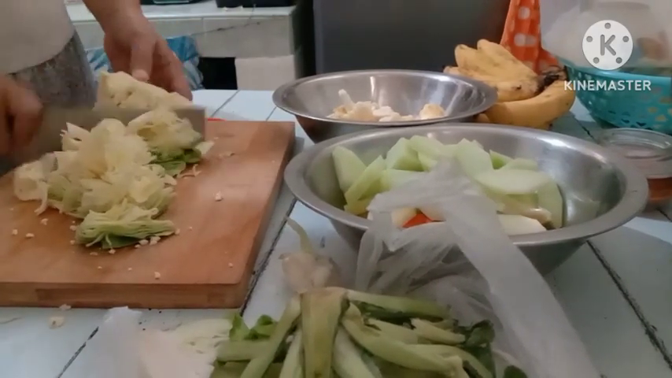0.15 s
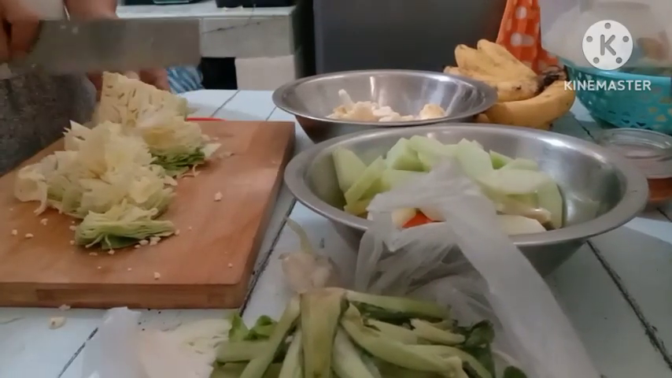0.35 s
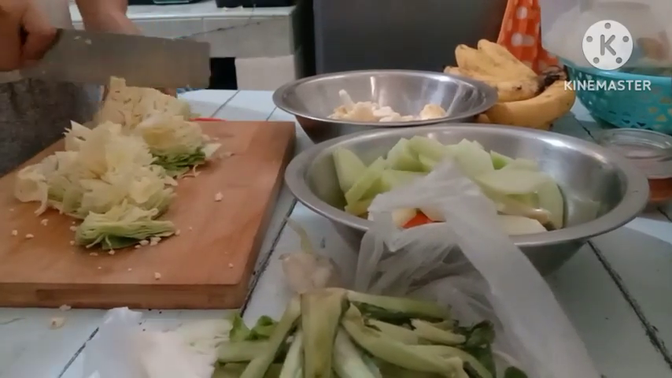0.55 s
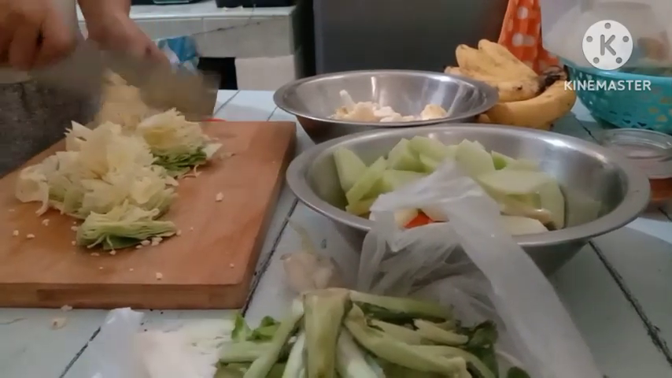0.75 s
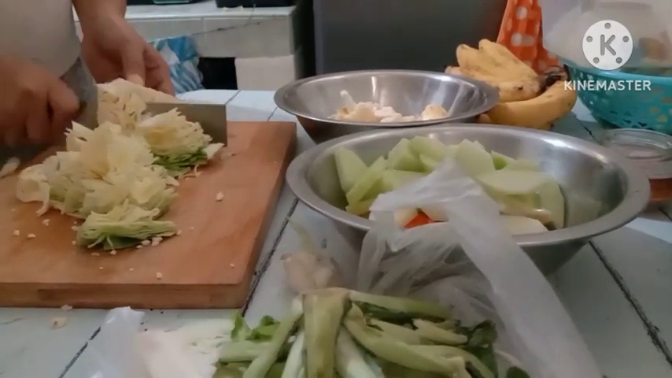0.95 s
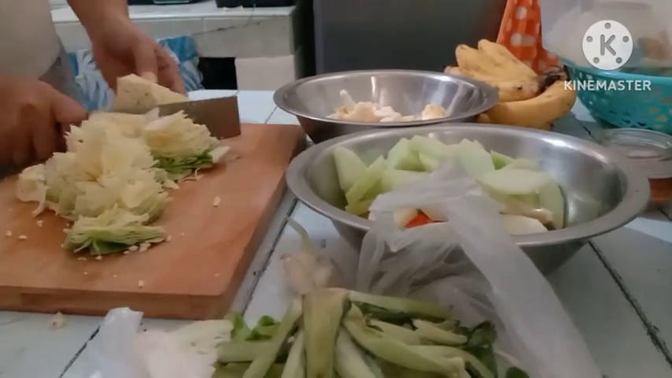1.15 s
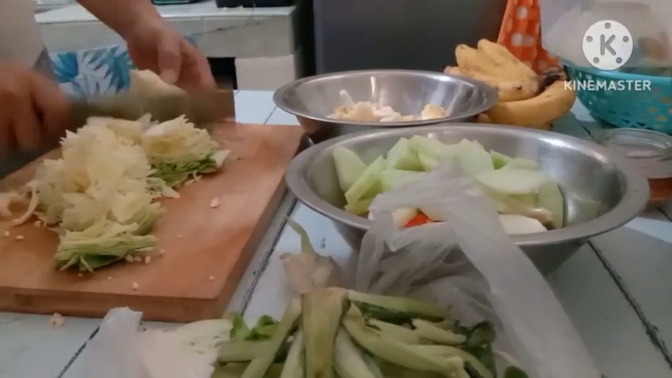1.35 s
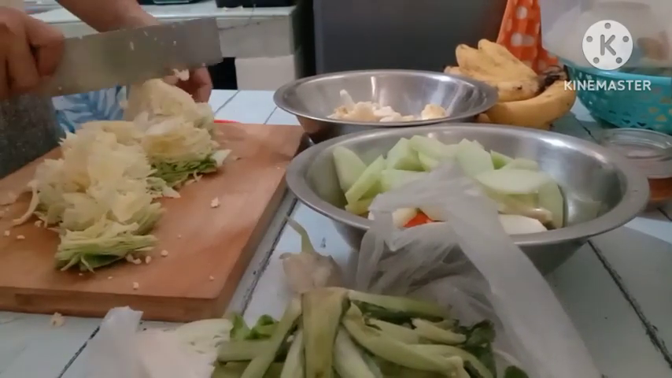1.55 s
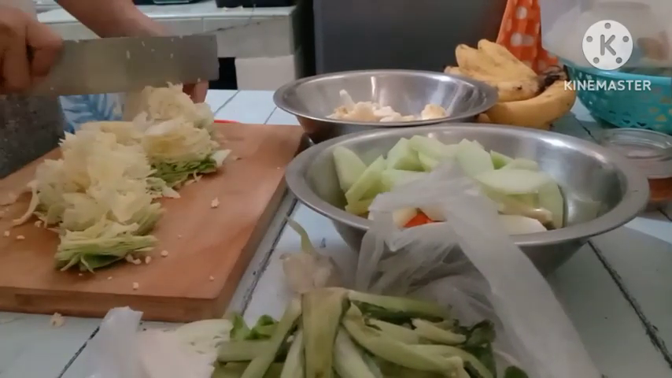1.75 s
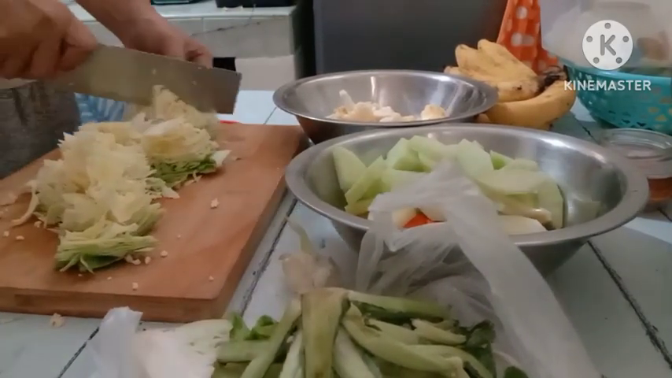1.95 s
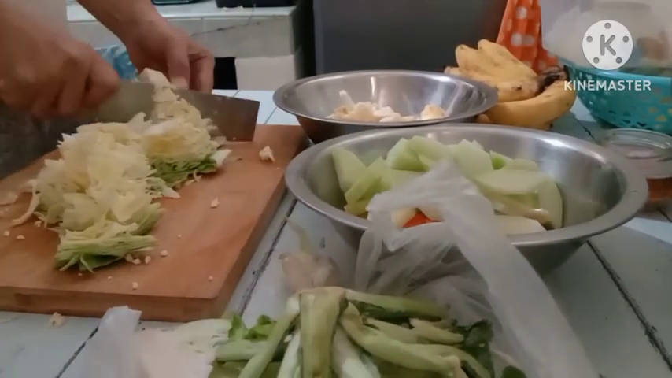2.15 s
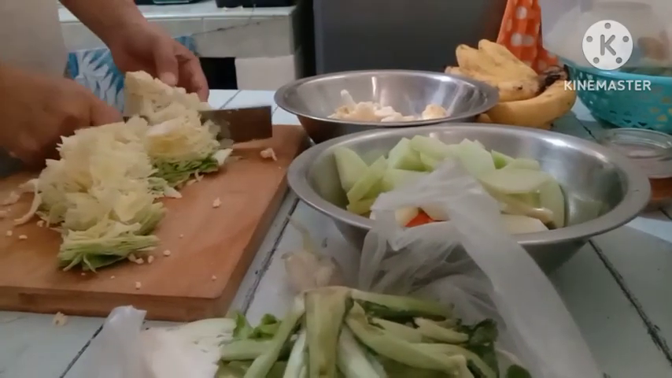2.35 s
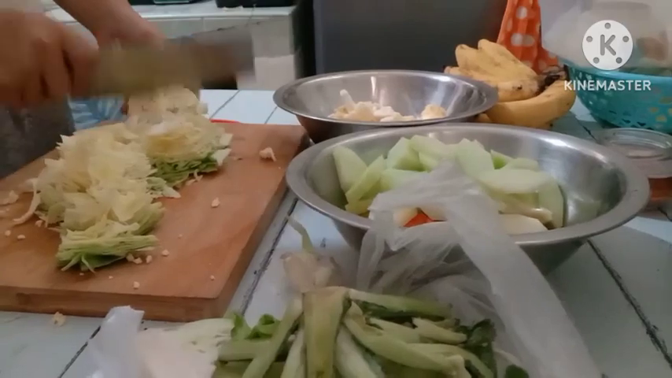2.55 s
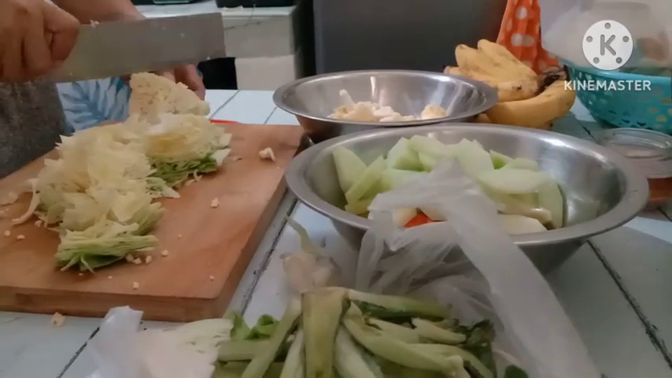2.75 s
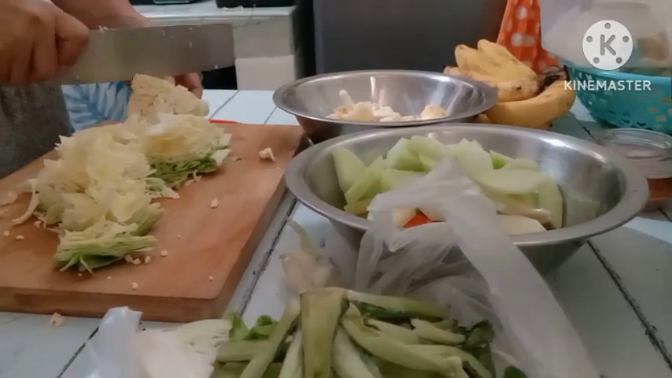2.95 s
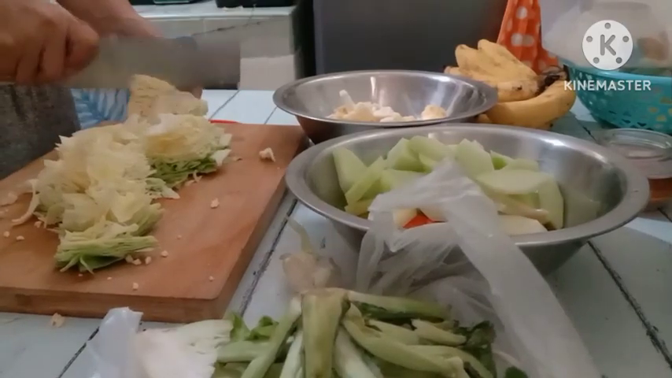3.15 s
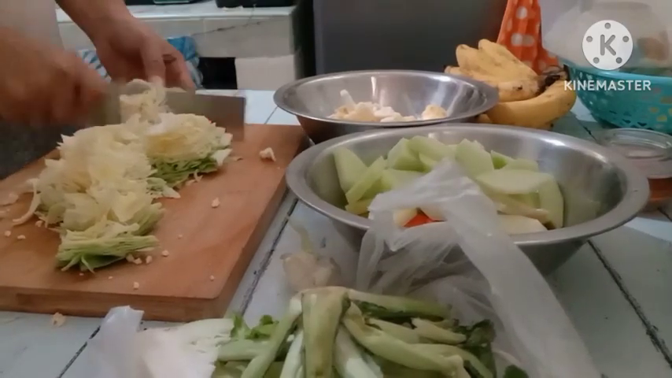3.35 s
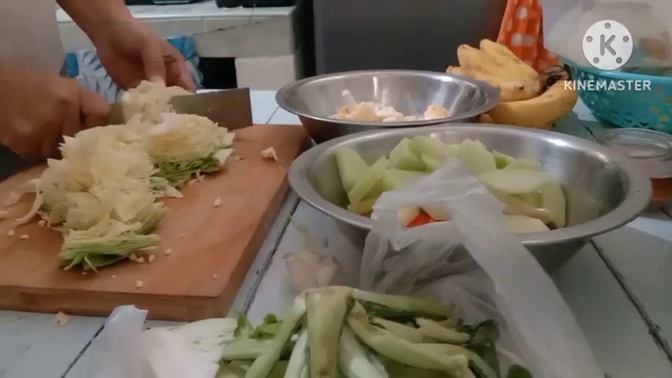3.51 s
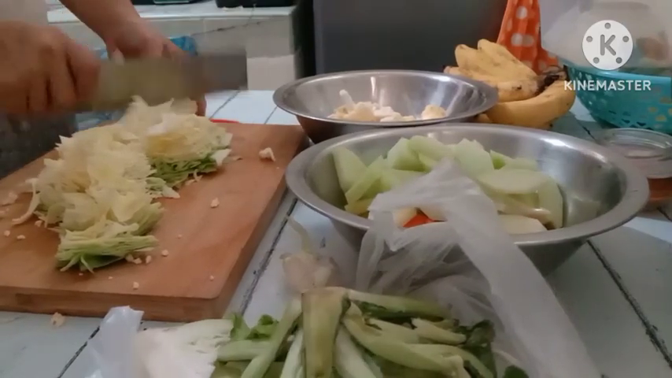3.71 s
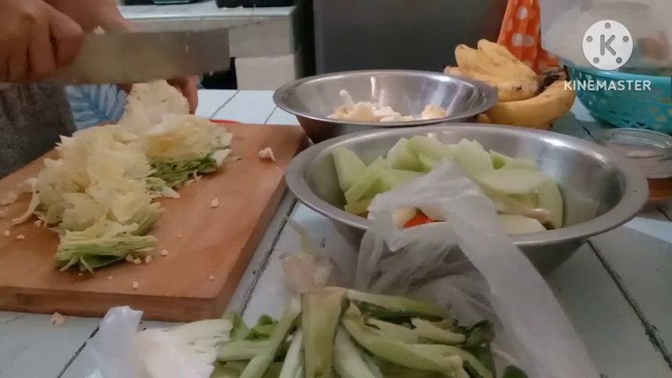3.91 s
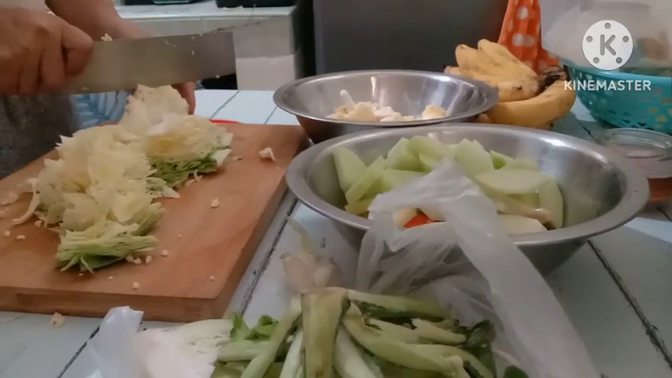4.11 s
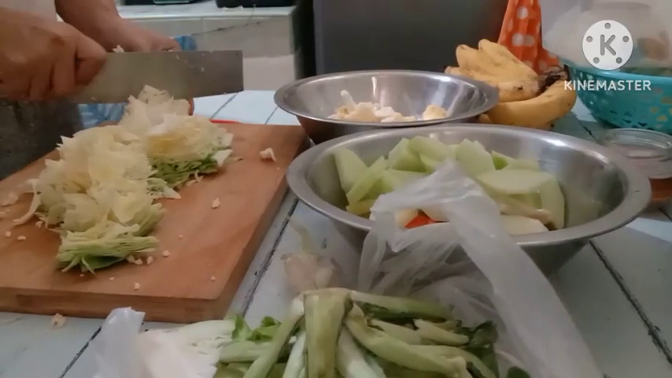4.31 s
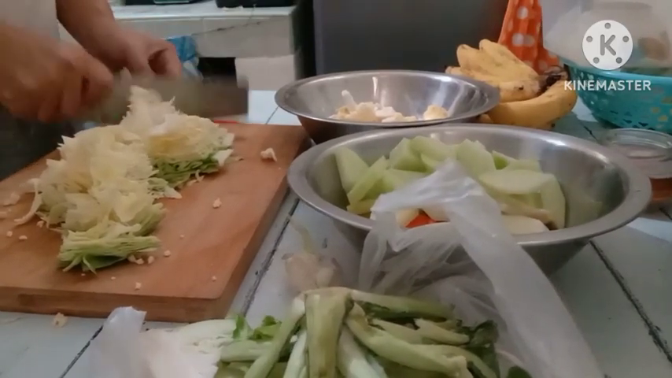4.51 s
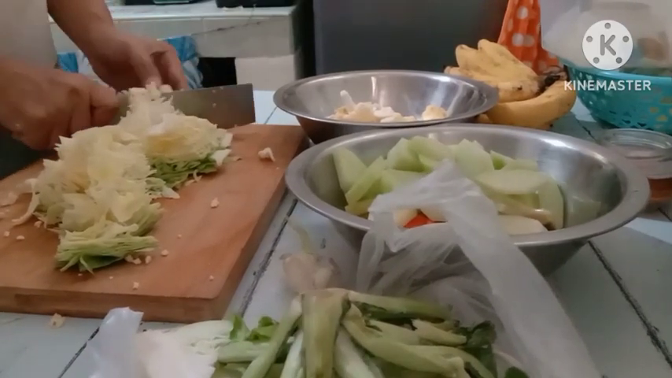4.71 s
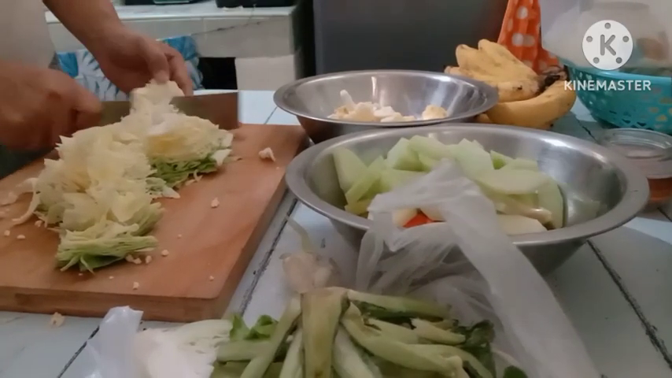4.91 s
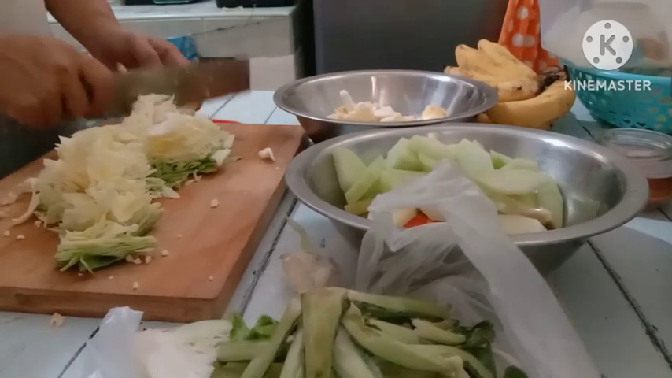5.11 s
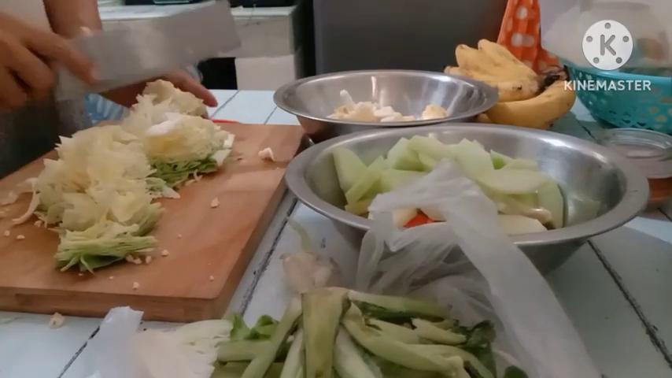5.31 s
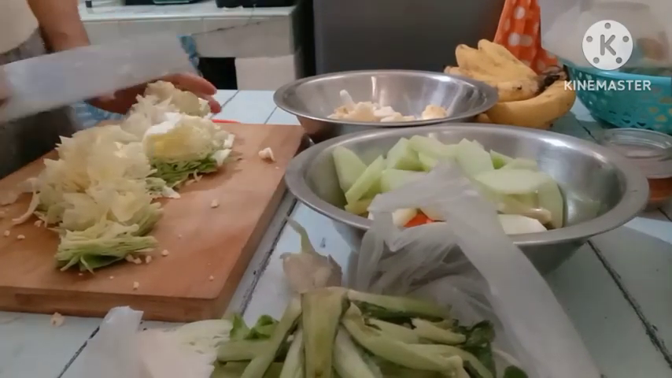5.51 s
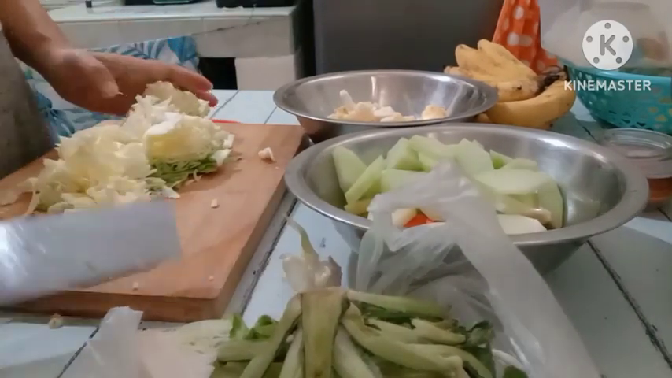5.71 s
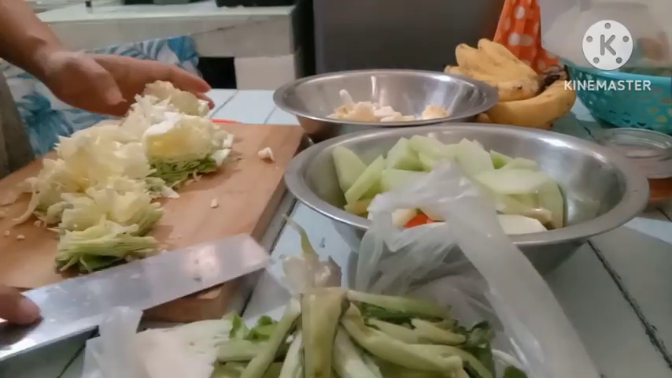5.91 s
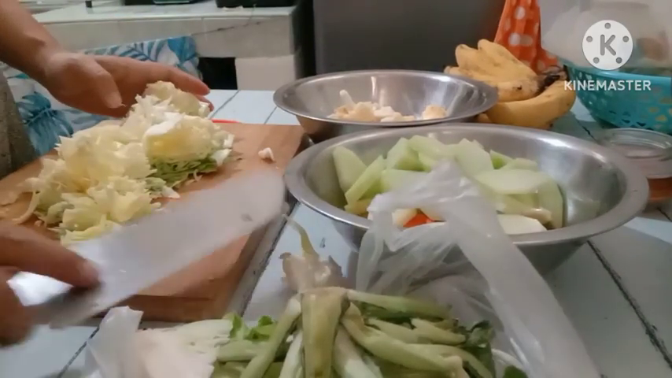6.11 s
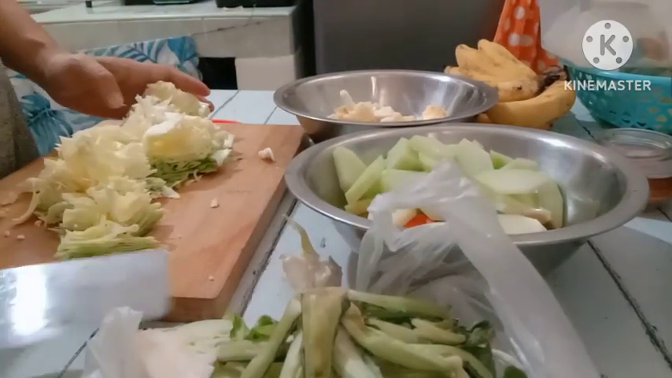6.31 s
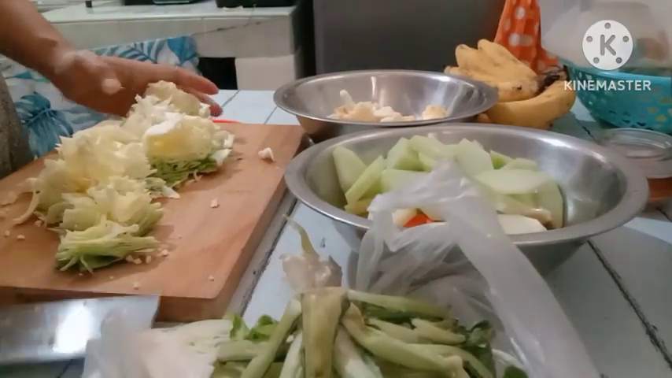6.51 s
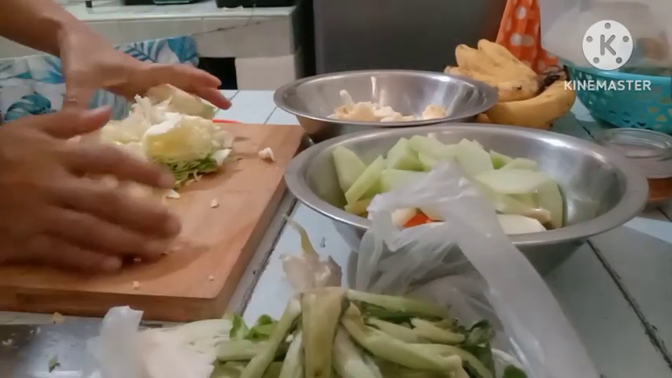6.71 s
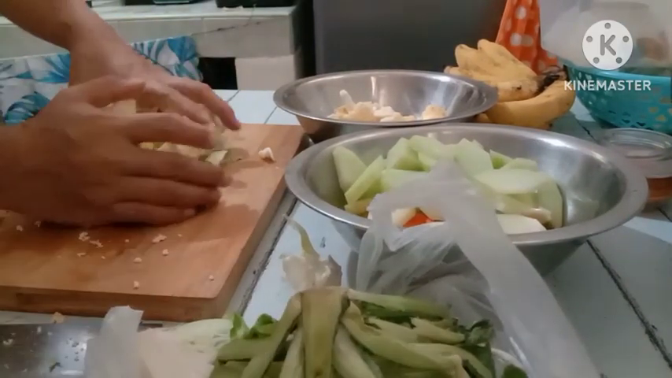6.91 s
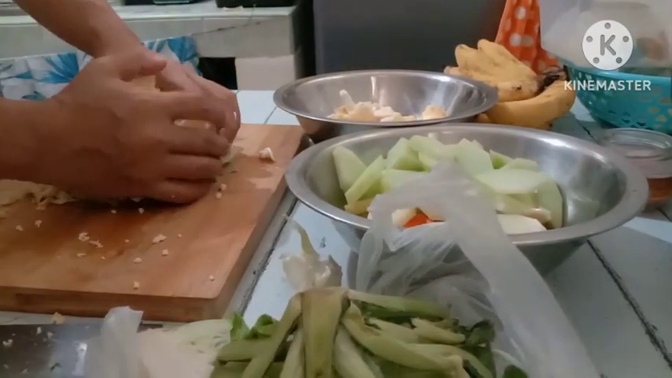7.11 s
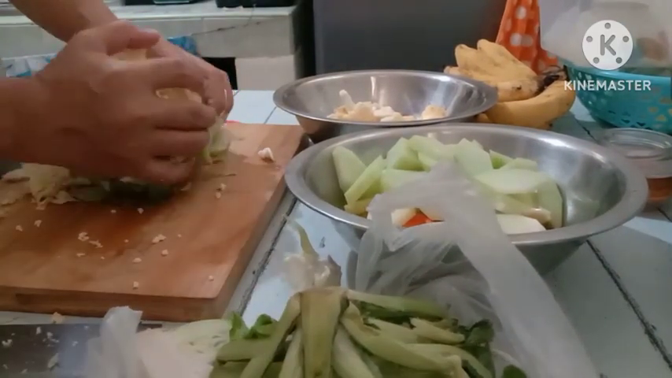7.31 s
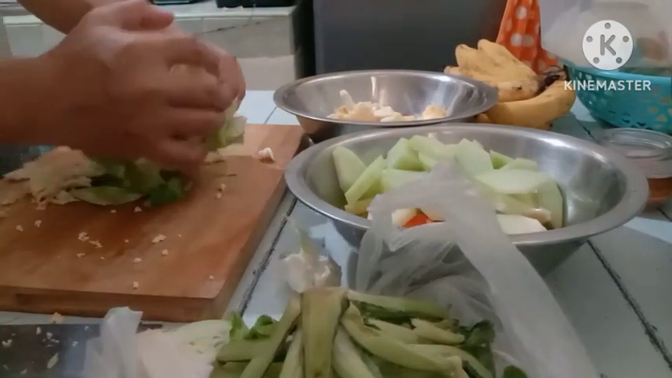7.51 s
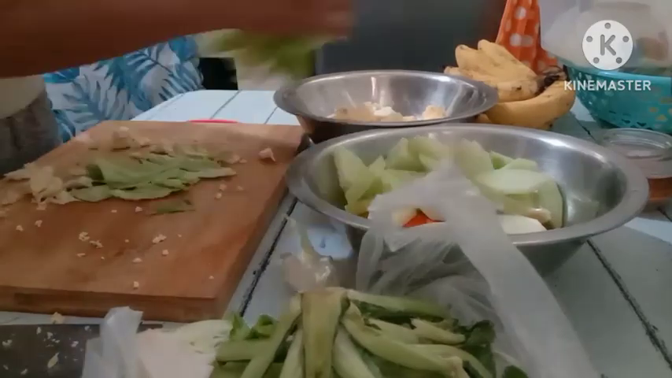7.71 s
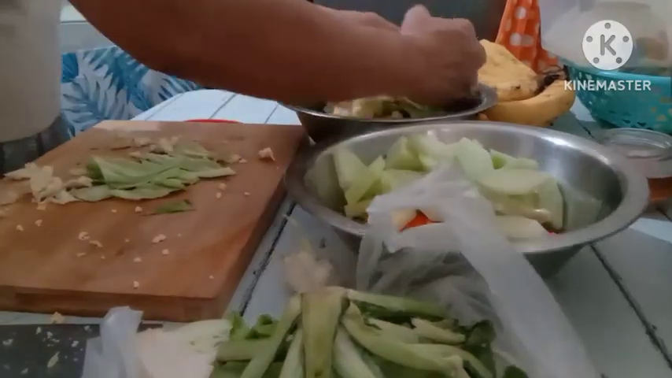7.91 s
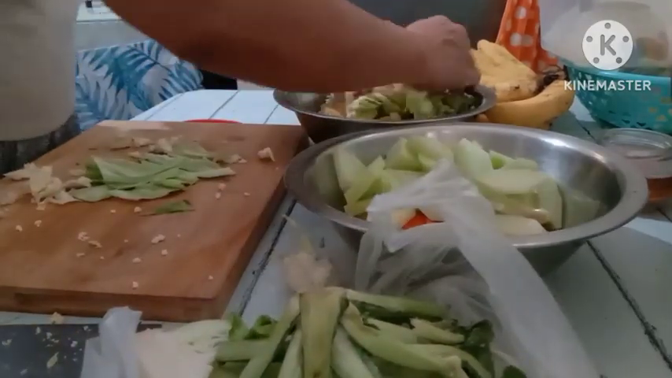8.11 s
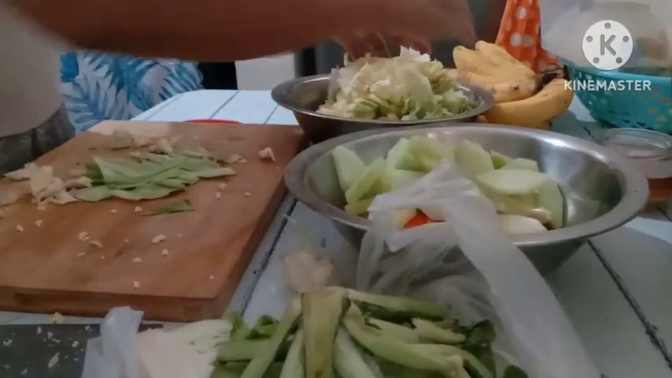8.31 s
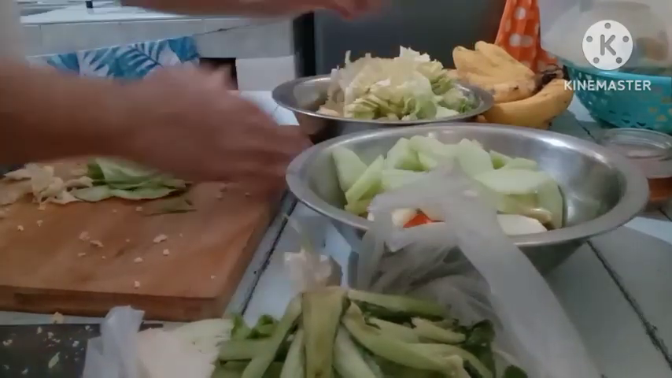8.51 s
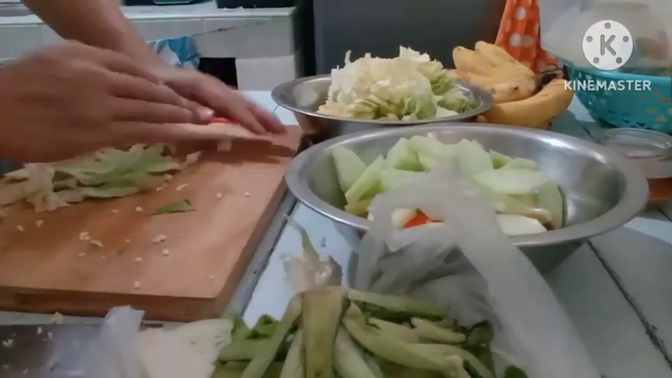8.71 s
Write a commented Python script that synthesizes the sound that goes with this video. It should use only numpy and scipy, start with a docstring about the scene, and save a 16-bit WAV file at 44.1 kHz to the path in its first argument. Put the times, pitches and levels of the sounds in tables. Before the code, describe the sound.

Crisp cuts through cabbage with knocks on wood, then a metal blade clinking down and soft leaf rustling in a small kitchen.

```python
"""In a small kitchen, a cleaver jerks through a cabbage in short cuts: leaves crackle, ribs crunch,
the edge knocks on a wooden board and sweeps the shreds aside. Then steel is tapped and rings, the
blade is dropped on the table, and hands gather the rustling shreds into a steel bowl.
The room echoes briefly. A background hiss lies under it all, and a low drone swells and fades."""
import sys
import numpy as np
from scipy import signal
from scipy.fft import rfft, irfft, next_fast_len
from scipy.io import wavfile
from scipy.ndimage import uniform_filter1d, map_coordinates

SR = 44100
rng = np.random.default_rng(int(sys.argv[2]) if len(sys.argv) > 2 else 0)


def dump(signal):
    """Clip the signal to [-1, 1] and save it as 16-bit WAV at the path in sys.argv[1]."""
    limited = np.clip(np.atleast_2d(signal).T, -1, 1)
    pcm = np.round(limited * 32767).astype(np.int16)
    wavfile.write(sys.argv[1], SR, pcm)


N = 385875
T = np.arange(SR // 4) / SR  # seconds since the start of one short sound

# Levels are relative. A ring time is how long a tone takes to fall 60 dB, before extra damping.
# How loud the hiss and the drone are as time passes: (time [s], level [dB])
HISS_LEVELS = [(0.0, -60), (1.41, -62), (2.6, -58.5), (3.6, -57.5), (4.5, -57), (6.09, -61), (7, -59.5),
               (8.75, -62)]
DRONE_LEVELS = [(0.0, -69), (1.9, -74.5), (2.63, -60), (3.5, -52), (4.41, -55), (5.3, -63), (6.09, -75),
                (8.75, -70.5)]
# Tone colour of the hiss, breaking cells, their fizz, the ribs and the whole sound:
# (frequency [Hz], level [dB])
HISS_COLOUR = [(15, 6.5), (65, -15.5), (130, -11), (200, -1.5), (340, -26.5), (420, -5.5), (570, -18.5),
               (700, -11), (960, -16.5), (2000, -10.5), (3000, -19.5), (5100, -25), (16000, -38)]
CRACKLE_COLOUR = [(1500, -31), (2800, -3), (4300, 0), (6000, 2.5), (8000, -6.5), (12000, -47)]
FIZZ_COLOUR = [(4000, -38), (7000, -4), (9000, -2), (13000, -6), (16000, -6.5)]
RIB_COLOUR = [(180, -39), (330, -3), (480, -4), (900, -9), (1500, -2), (2600, -3.5), (4500, -39),
              (8000, -50)]
OVERALL_COLOUR = [(3000, 1), (5500, -0.5), (7000, -4.5), (9000, -0.5), (10300, -5), (12000, 0),
                  (13200, -8.5), (15300, -4), (15700, -26.5)]
# Resonances, the pitches that each thing favours: (frequency [Hz], width [Hz], level [dB])
WHINE_PEAKS = [(2088, 140, 0)]
DRONE_PEAKS = [(103.8, 12, -3.5), (148, 14, -4.5), (187.6, 25, -3.5), (217, 40, -4), (291.8, 11, 3.5),
               (421.3, 16, -7)]
TABLE_PEAKS = [(190.4, 21, 4.5), (432, 59, 2), (739, 38, 1), (1215, 35, -5.5)]
BOARD_HIGH_PEAKS = [(1397, 140, -0.5), (1644, 98, 5.5), (2025, 130, -6.5), (2455, 50, 7), (3066, 130, -0.5),
                    (3570, 200, -27.5), (4900, 610, -6)]
BOARD_HOLLOW_PEAKS = [(427, 30, 3), (619, 185, -2.5), (970, 45, 0.5)]
BOARD_SCRAPE_PEAKS = [(700, 350, -2.5), (1348, 77, 1.5), (1550, 150, 1)]
MIC_OPENING_PEAKS = [(2030, 67, 3.5)]
# How long the kitchen echoes: (frequency [Hz], ring time [s])
ROOM_RING_TIMES = [(150, 0.19), (1500, 0.22), (5000, 0.19), (14000, 0.13)]
# Tones of the steel bowl and the bending board: (frequency [Hz], level [dB], ring time [s])
BOWL_TONES = [(2250, 5, 0.042), (3445, -2, 0.066), (4600, 4, 0.042), (5830, -1, 0.054), (6360, -8, 0.11),
              (7670, -4, .06)]
BOARD_TONES = [(110, -19, 0.099), (147.8, 4, 0.24), (197.9, 5, 0.16), (239.6, -3.5, 0.3), (309, -8, 0.015),
               (426.3, -9.5, 0.45)]
# Tones of steel: (frequency [Hz], ringing freely [dB], on table [dB], on board [dB], ring time [s])
STEEL_TONES = [(1393, -30, -13.5, -5.5, 0.057), (1912, -18, -25, -18, .24), (2235, -15, -13, -9, 0.25),
               (2640, -16, -7, -4.5, 0.05), (3410, -6, -18.5, -20.5, 0.074), (3466, -27.5, -42, -7.5, 0.15),
               (3917, -39, -2, -11, 0.1), (4339, -14.5, -24.5, -29.5, 0.27), (4520, -16, -28, -20, 0.16),
               (4760, -26.5, -16.5, -10.5, 0.1), (5460, -18.5, -7, -39, 0.037), (5400, -8, -28, -21, .1),
               (5950, -10.5, -25, -13, .11), (7079, -14, -13, -31, .09), (8350, -19, -23.5, -30.5, 0.17),
               (8800, -41, -26.5, -26.5, 0.14), (9180, -33, -30.5, -26.5, .11),
               (9600, -5.5, -26, -25, 0.068), (10050, -21, -16, -24, 0.13), (10860, -8, -20.5, -18, 0.15),
               (11960, -10.5, -35.5, -33, 0.1), (14020, -26, -22.5, -14, .07)]
# The bowl is tapped: (time [s], level [dB])
BOWL_TAPS = [(8.0123, -35.5), (8.088, -26)]
# Steel is tapped and rings freely: (time [s], level [dB], ring offset [dB])
STEEL_TAPS = [(6.2439, -27.5, 2.5), (6.5923, -16, -19)]
# The blade rattles down on the table: (time [s], level [dB], ring offset [dB], knock offset [dB])
BLADE_DROPS = [(6.5082, -30.5, 3, -9.5), (6.584, -21, 3, -11), (6.6144, -38.5, -4.5, 0),
               (6.6542, -11, -24, -14.5), (6.6946, -25.5, -4.5, -1.5), (6.7157, -19, -46, -14),
               (6.7486, -30.5, -11.5, -4), (6.7844, -44, -12, -1.5)]
# The edge meets wood or snaps a rib:
# (time [s], level [dB], knock pitch [Hz], board offset [dB], blade offset [dB])
CHOPS = [(0.0122, -13, 2400, -30, -8.5), (0.9, -18.5, 1490, -10, -19.5), (1.059, -15, 2020, -14, -19),
         (2.174, -27, 2050, -42, -24), (2.22, -17, 1460, -10, -22), (2.313, -6.5, 2320, -18, -20),
         (3.47, -5, 2410, -21.5, -25), (3.566, -5.5, 1434, -20, -51), (4.643, -5, 2420, -23.5, -30),
         (4.743, -27, 1660, -12, -34)]
# Leaves are dragged or handled: (loudest moment [s], length [s], rustle [dB], scrape offset [dB])
SWEEPS = [(0.055, 0.12, -48, 4), (0.149, 0.11, -47.5, -1.5), (1.176, 0.076, -57, 5.5),
          (1.262, 0.15, -50.5, 2.5), (2.347, 0.18, -54.5, -5), (2.49, 0.25, -67, 8), (4.91, 0.14, -52, 1),
          (5.06, 0.13, -52, 4.5), (5.282, 0.13, -77.5, 22.5), (6.457, 0.088, -62.5, -5),
          (6.862, 0.1, -53, -1), (6.983, 0.14, -60.5, -5), (7.098, 0.13, -55, -9.5),
          (7.222, 0.22, -58.5, -18.5), (7.332, 0.087, -58, -3.5), (7.427, .1, -67.5, -5),
          (7.542, 0.059, -68.5, 9.5), (7.727, 0.017, -64, 5), (7.794, 0.022, -65, 6.5),
          (8.016, .14, -59, -11), (8.111, 0.033, -55, -6.5), (8.76, .14, -60, -10)]
# Single fibres snap: (time [s], level [dB], pitch [Hz])
FIBRE_SNAPS = [(0.829, -43, 4510), (0.9377, -28, 4530), (0.9673, -32, 5250), (1.1715, -30.5, 4630),
               (2.0294, -35, 8000), (3.1461, -42, 4960), (3.545, -26, 4840), (4.7229, -21.5, 4500),
               (2.153, -29, 6000), (7.405, -41, 5630), (7.4827, -43, 4500), (7.588, -54, 9000),
               (7.34, -47, 1900)]
# The board is bumped: (time [s], thump [dB], push pitch [Hz], leaf crunch [dB])
BOARD_BUMPS = [(0.737, -45, 350, -51), (1.682, -64, 251, -56), (3.207, -72, 260, -55),
               (4.464, -33, 260, -58), (5.241, -32, 310, -63), (5.544, -70, 232, -58),
               (5.745, -52, 150, -74), (5.14, -48, 120, -74), (8.02, -50, 257, -66), (8.05, -53, 191, -63),
               (8.169, -57, 200, -64)]
# The blade jerks through leaves: (time [s], crackle [dB], crunch offset [dB], thump [dB], length [s])
CUTS = [(0.552, -71, -4, -67, 0.036), (0.595, -66.5, 1, -81, 0.065), (0.697, -47.5, -1, -44.5, 0.033),
        (0.86, -41.5, -6.5, -44, 0.058), (0.976, -45, 3, -42.5, 0.055), (1.029, -44, 4.5, -47, 0.075),
        (1.876, -52.5, -1.5, -46.5, 0.031), (1.983, -48.5, -4.5, -43.5, 0.044),
        (2.062, -53, -8, -53.5, 0.03), (2.083, -45.5, -5.5, -42, 0.027), (2.152, -41, -11.5, -38.5, 0.053),
        (2.189, -50.5, 5, -41.5, 0.07), (2.267, -50, -2.5, -55, 0.074), (2.336, -38.5, 7, -47, 0.0243),
        (2.455, -64, 14, -62, 0.016), (2.961, -71, 7, -54, 0.027), (3.081, -51, -12, -45.5, 0.025),
        (3.252, -44, -5, -34, 0.046), (3.362, -48.5, 0.5, -39, .03), (3.44, -44, 1, -52.5, 0.034),
        (3.552, -33.5, 5, -59, 0.013), (4.237, -52, -10, -49, 0.035), (4.344, -62.5, 6, -49, .035),
        (4.434, -40.5, -6.5, -41.5, 0.035), (4.516, -61, 5.5, -47.5, 0.032),
        (4.621, -38, 0.5, -37.5, 0.045), (4.724, -39.5, -3, -70, .032)]

RINGING_FREELY, ON_TABLE, ON_BOARD = 1, 2, 3  # level columns of STEEL_TONES


def amp(db):
    """Turn decibels into a number to multiply by."""
    return np.exp(np.asarray(db) * np.log(10) / 20)


def unit(x):
    """Scale a signal to an average power of 1."""
    return x / np.sqrt(np.mean(x ** 2) + 1e-20)


def noise(samples=len(T)):
    """Plain hiss, as long as T unless told otherwise."""
    return rng.standard_normal(samples)


def along(points, hz):
    """Read between (frequency, value) points on a scale of octaves."""
    f, v = np.transpose(points)
    return np.interp(np.log(hz + 1), np.log(f + 1), v)


def loudness(rows):
    """Join (time, level) points into one gain per sample."""
    return amp(np.interp(np.arange(N) / SR, *np.transpose(rows)))


def wobble(rate):
    """A smooth curve through `rate` random points a second."""
    return map_coordinates(noise(int(N * rate / SR) + 4), [np.arange(N) * rate / SR])


def filtered(x, response):
    """Strengthen or weaken each frequency of x as `response` says."""
    size = next_fast_len(len(x) + 8192)
    return irfft(rfft(x, size) * response(np.fft.rfftfreq(size, 1 / SR)), size)[:len(x)]


def resonant(peaks):
    """A filter response that favours the given peaks."""
    return lambda f: sum((-1) ** k * amp(db) * 1j * f * width / (hz * hz - f * f + 1j * f * width)
                         for k, (hz, width, db) in enumerate(peaks))


def ring(tones, scatter_db, damping=1, rough=0):
    """Fading tones, struck at new strengths each time; rough contact makes them waver."""
    hz, db, ring_s = np.transpose(tones)[:, :, None]
    strength, phase = rng.standard_normal((2, len(tones), 1))
    drift = rng.standard_normal((len(tones), len(T) // 32 + 1)).cumsum(axis=1)
    wander = rough * np.repeat(drift, 32, axis=1)[:, :len(T)]
    fade = amp(db + scatter_db * strength - 60 * damping * T / ring_s)
    return (fade * np.sin(2 * np.pi * hz * T + phase + wander)).sum(axis=0)


def add(track, s, sound):
    """Mix a sound in, starting at s seconds."""
    track[round(s * SR):][:len(sound)] += sound


def background_hiss():
    """Background hiss in faint patches, with a thin, wavering whine near 2 kHz."""
    spectrum = signal.stft(noise(N), nperseg=512)[2]
    patches = uniform_filter1d(rng.standard_normal(spectrum.shape), size=3, axis=0)
    patches = uniform_filter1d(patches, size=9, axis=1)
    air = signal.istft(spectrum * amp(2.4 * unit(patches)), nperseg=512)[1][:N]
    hiss = unit(filtered(air, lambda hz: amp(along(HISS_COLOUR, hz))))
    waver = amp(-14 + 3 * wobble(12) + 4 * wobble(4))
    whine = unit(filtered(noise(N), lambda hz: resonant(WHINE_PEAKS)(hz) ** 2))
    return loudness(HISS_LEVELS) * amp(-0.5) * (hiss + waver * whine)


def drone():
    """A rough, low hum swells and fades, perhaps an engine passing."""
    hum = unit(filtered(noise(N), lambda hz: resonant(DRONE_PEAKS)(hz) / (1 + (hz / 600) ** 4)))
    return loudness(DRONE_LEVELS) * amp(-2 + 2.4 * wobble(21)) * hum


def kitchen_echo(x):
    """Each frequency of the echo dies at its own speed; the echo differs from moment to moment."""
    out, step, delay_s = np.zeros(N + SR), SR // 4, 0.0036
    for start in range(0, N, step):
        hz, t, spectrum = signal.stft(noise(SR // 3), SR, nperseg=256)
        fade = amp(-60 * t / along(ROOM_RING_TIMES, hz)[:, None])
        tail = signal.istft(spectrum * fade, SR, nperseg=256)[1]
        echo = signal.fftconvolve(x[start:start + step], tail / np.linalg.norm(tail))
        add(out, start / SR + delay_s, echo)
    return out[:N]


def bowl_taps():
    """The steel bowl rings briefly over a bright tick."""
    out = np.zeros(N + SR)
    for s, db in BOWL_TAPS:
        steel = ring(BOWL_TONES, scatter_db=0.92)
        tick = amp(-3 - 60 * T / 0.051) * np.diff(noise(len(T) + 1))
        add(out, s, amp(db - 18) * (steel + tick))
    return out[:N]


def steel_ring(contact, damping):
    """Struck steel rings in many tones; `contact` picks which of them are loudest."""
    tones = [(tone[0], tone[contact], tone[4]) for tone in STEEL_TONES]
    return ring(tones, scatter_db=1, damping=damping, rough=0.12)


def steel_clinks():
    """Tapped or dropped, steel rings over a crack and a short clatter; the table knocks below."""
    out, pushes = np.zeros((2, N + SR))
    free_damping, table_damping, tap_knock_db = 0.97, 1.8, -35.5
    taps = [(*tap, tap_knock_db, RINGING_FREELY, free_damping) for tap in STEEL_TAPS]
    drops = [(*drop, ON_TABLE, table_damping) for drop in BLADE_DROPS]
    for s, db, ring_db, knock_db, contact, damping in taps + drops:
        steel = amp(ring_db) * steel_ring(contact, damping)
        clatter = noise() * (amp(-7.5 - 60 * T / 0.0021) + amp(-5 - 60 * damping * T / 0.096))
        add(out, s, amp(db) * (steel + clatter))
        add(pushes, s, amp(db + knock_db + 14 - 60 * T / 0.13) * noise())
    table = filtered(pushes[:N], lambda f: resonant(TABLE_PEAKS)(f) * 1j * f / (150 + 1j * f))
    return out[:N] + table


def board_thump(db, push_hz, damping):
    """The board bends under a soft push; tones near the push's own pitch answer most."""
    tones = [(hz, level - 12 * abs(np.log2(hz / push_hz)), ring_s) for hz, level, ring_s in BOARD_TONES]
    bend = ring(tones, scatter_db=2, damping=1.2 * damping, rough=0.07)
    return amp(db + 6.5) * bend * (1 - np.exp(-T * damping / 0.012))


def leaf_sweeps():
    """Loudness curves for rustle, scrape and fizz: each sweep swells to a broad top and fades."""
    gains, from_top_s = np.zeros((3, N + 2 * SR)), np.arange(-SR // 4, SR // 4) / SR
    rise_share, fade_db, steepness = 0.46, 18, 2.4
    dulling = 0.46  # dB of fizz lost per dB of scrape: leaves pressed on wood sound duller
    away = np.where(from_top_s < 0, -from_top_s / rise_share, from_top_s / (1 - rise_share))
    for s, length, db, scrape_db in SWEEPS:
        swell = amp(db - fade_db * (away / length) ** steepness)
        for track, extra_db in zip(gains, (0, scrape_db, -dulling * scrape_db)):
            add(track, s, amp(extra_db) * swell)
    return gains[:, SR // 4:SR // 4 + N]


def fibre_snaps():
    """Single fibres click as they snap, and leaves crinkle at random while they are gathered."""
    out, gather_s, crinkle_count = np.zeros(N + SR), (6.85, 7.45), 20
    crinkles = [(np.interp(when, [0, 1], gather_s), -58 - 4 * np.log(softness + 0.05),
                 5130 * 2 ** (0.92 * (pitch - 0.5)))
                for when, softness, pitch in rng.random((crinkle_count, 3))]
    for s, db, hz in FIBRE_SNAPS + crinkles:
        click = noise(400) * amp(db - 5 - 60 * T[:400] / 0.0096)
        add(out, s, filtered(click, resonant([(hz, 0.82 * hz, 3)])))
    return out[:N]


def tiny_breaks(colour, spiky_db, flutter_db):
    """Grainy noise made of many tiny breaks and a few large ones."""
    breaks = noise(N) * amp(spiky_db * np.minimum(rng.exponential(1, N), 5) + flutter_db * wobble(220))
    return unit(filtered(breaks, lambda hz: amp(along(colour, hz))))


def jerk(length_s, rise_s=0.0078):
    """The loudness of one jerk: it rises fast, holds and stops."""
    return np.exp(-(T / length_s) ** 4.5) * (1 - np.exp(-T / rise_s))


def cabbage():
    """Jerks break cells (crackle, fizz) and ribs (crunch) and push the board; sweeps rustle and scrape."""
    crackle, crunch, fizz, thumps = np.zeros((4, N + SR))
    push_s, bump_s = 0.05, 0.011  # a push shorter than push_s damps the thump more
    for s, db, crunch_db, thump_db, length in CUTS:
        shape = jerk(length)
        add(crackle, s, amp(db) * shape)
        add(crunch, s, amp(db + crunch_db) * shape)
        add(fizz, s, amp(-46.5 + 0.7 * (db + 49.5)) * shape)  # fizz grows more slowly than crackle
        add(thumps, s, board_thump(thump_db, push_hz=209, damping=push_s / length))
    for s, thump_db, hz, crunch_db in BOARD_BUMPS:
        add(crunch, s, amp(crunch_db) * jerk(2 * bump_s))
        add(thumps, s, board_thump(thump_db, hz, damping=push_s / bump_s))
    snaps = fibre_snaps()
    rustle, scrape, sweep_fizz = leaf_sweeps()
    # the dragged edge makes the board rasp
    rasp = unit(filtered(noise(N), lambda hz: resonant(BOARD_SCRAPE_PEAKS)(hz) ** 2))
    ribs = (crunch[:N] + amp(-5.5) * scrape) * tiny_breaks(RIB_COLOUR, spiky_db=2.5, flutter_db=4)
    cells = (crackle[:N] + amp(-0.5) * rustle) * tiny_breaks(CRACKLE_COLOUR, 2.4, 3.2)
    spray = (fizz[:N] + amp(-3) * sweep_fizz) * tiny_breaks(FIZZ_COLOUR, 2.0, 3.7)
    return cells + spray + ribs + amp(-4.5) * scrape * rasp + thumps[:N] + snaps


def chops():
    """The edge knocks and cracks as it lands; the board rattles and thumps, and the blade rings a little."""
    out, contact_s = np.zeros(N + SR), 0.00223
    settle = T / contact_s
    contact = amp(-4 * settle) * np.exp(-settle ** 6)  # the knock stops when the edge settles
    for s, db, hz, board_db, blade_db in CHOPS:
        splinters = filtered(noise() * contact, resonant([(3980, 1360, -4)]))
        knock = amp(-6.5) * contact * np.sin(2 * np.pi * hz * T * (1 + 0.066 * np.exp(-settle)))
        rattle = noise() * amp(-6.5 - 60 * T / 0.12) * (1 - np.exp(-T / 0.002))
        near_knock = resonant([(hz, 0.9 * hz, 1.5)])
        bright = filtered(rattle, lambda f: (resonant(BOARD_HIGH_PEAKS)(f) + amp(-12.5)) * near_knock(f))
        hollow = amp(board_db + 19) * filtered(rattle, resonant(BOARD_HOLLOW_PEAKS))
        crack_fade = amp(-60 * T / 0.004) + amp(-25.5 - 60 * T / 0.12)
        crack = amp(blade_db - 1.5) * crack_fade * np.diff(noise(len(T) + 1))
        steel = amp(blade_db) * steel_ring(ON_BOARD, damping=1.1)
        thump = board_thump(board_db - 10.5, push_hz=223, damping=2)
        add(out, s, amp(db) * (knock + splinters + bright + hollow + crack + steel + thump))
    return out[:N]


def scene():
    """The kitchen work, its echo and the background."""
    work = cabbage() + chops() + steel_clinks() + bowl_taps()
    return (work + amp(-10) * kitchen_echo(work) + background_hiss() + drone())[None]


def record(dry):
    """The deep bass and the highest treble are cut off; the microphone's opening resonates near 2 kHz."""
    def response(hz, lowest_hz=85, highest_hz=16800):
        bass_cut = (1j * hz / (lowest_hz + 1j * hz)) ** 3
        opening = 1 + resonant(MIC_OPENING_PEAKS)(hz)
        return bass_cut * opening * amp(along(OVERALL_COLOUR, hz)) * (hz < highest_hz)
    return filtered(dry[0], response)[None]


dry = scene()
out = record(dry)
dump(out)
```